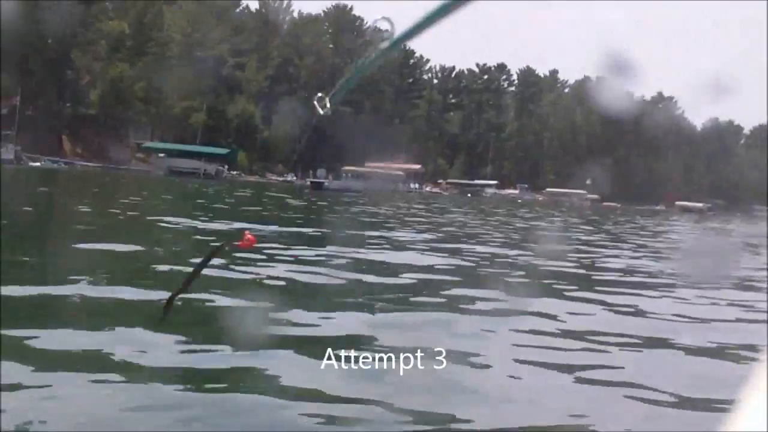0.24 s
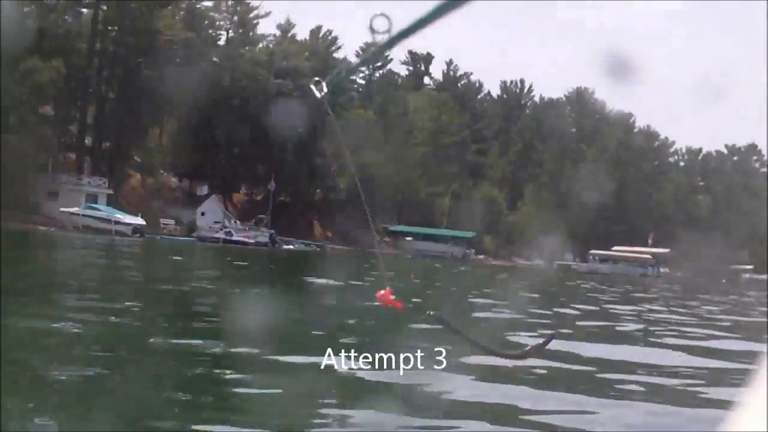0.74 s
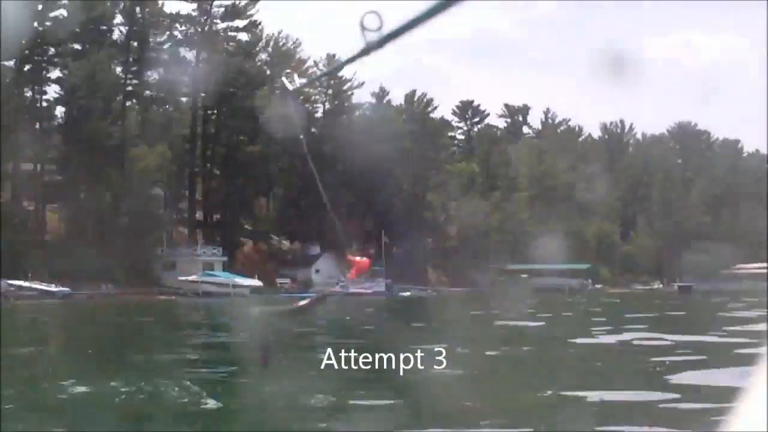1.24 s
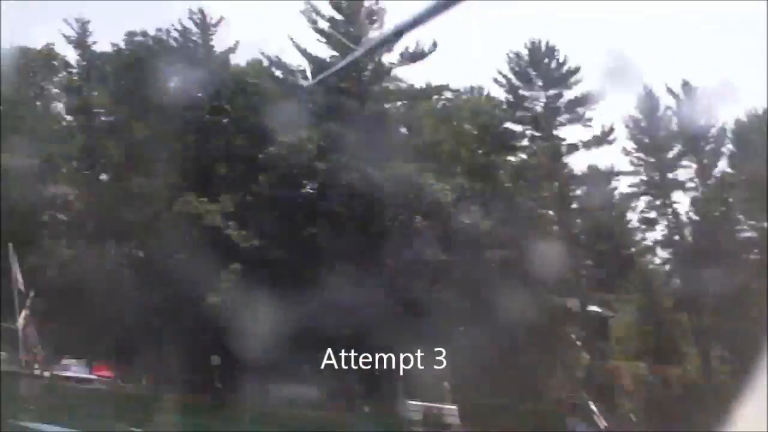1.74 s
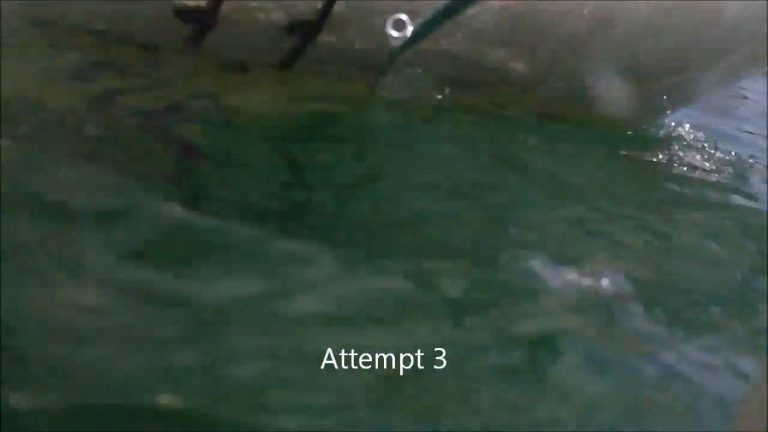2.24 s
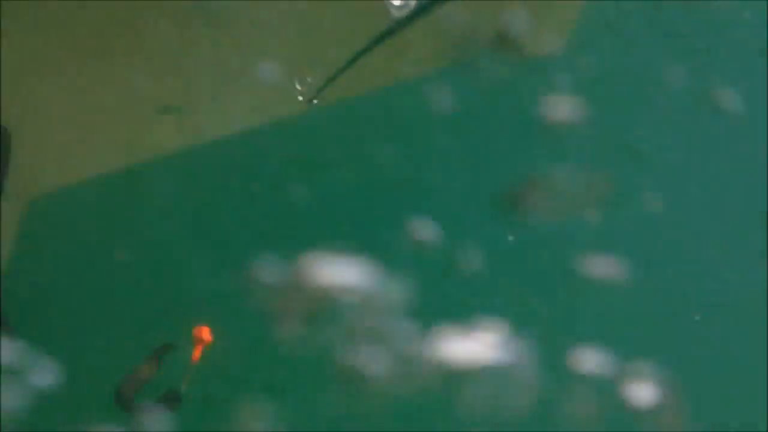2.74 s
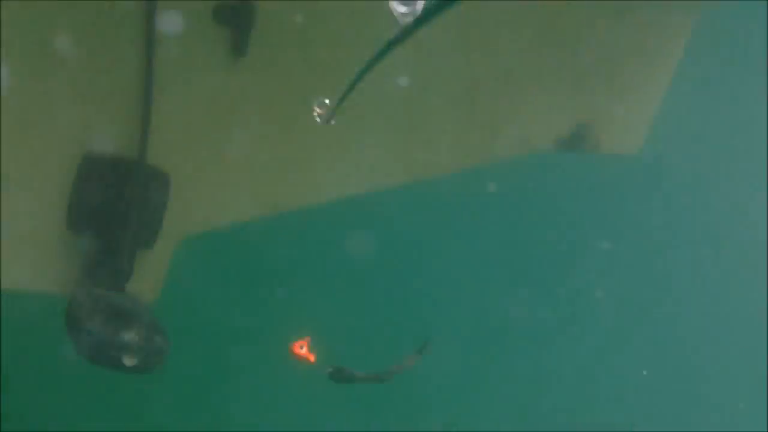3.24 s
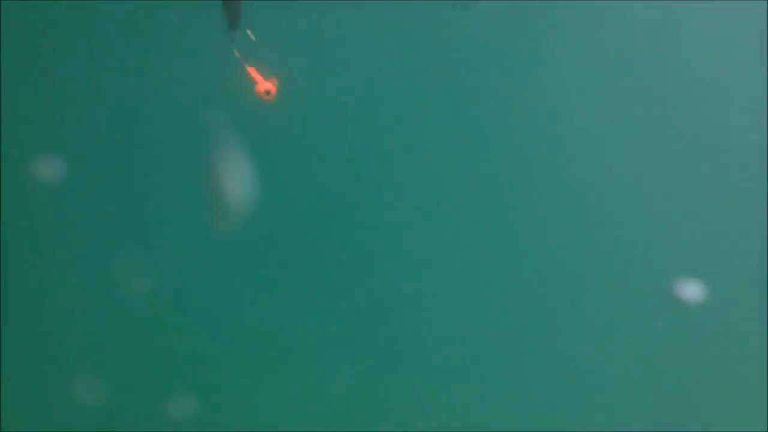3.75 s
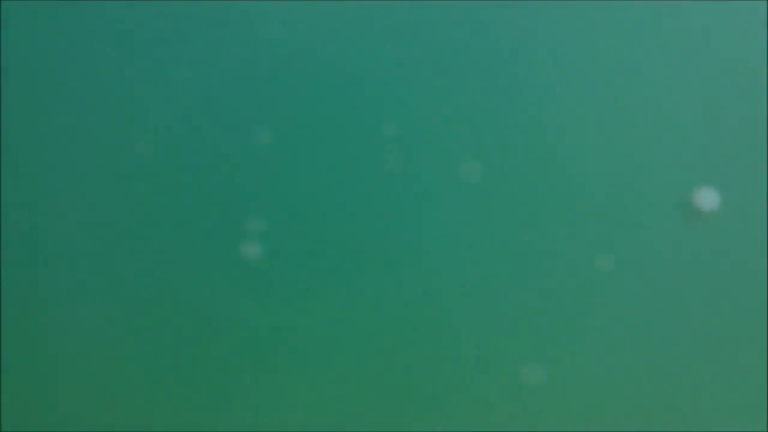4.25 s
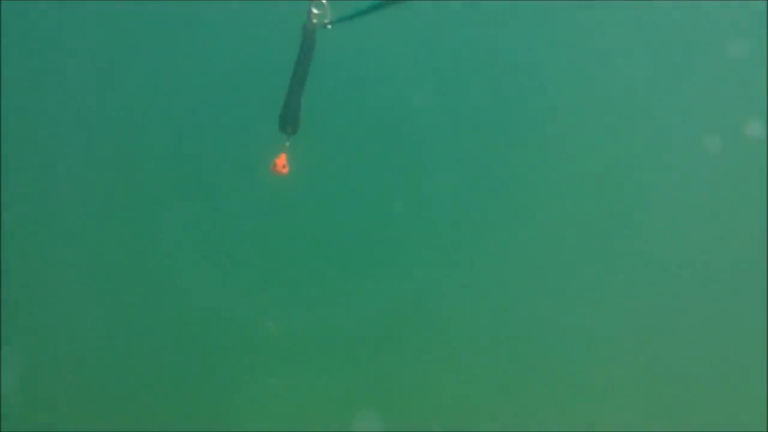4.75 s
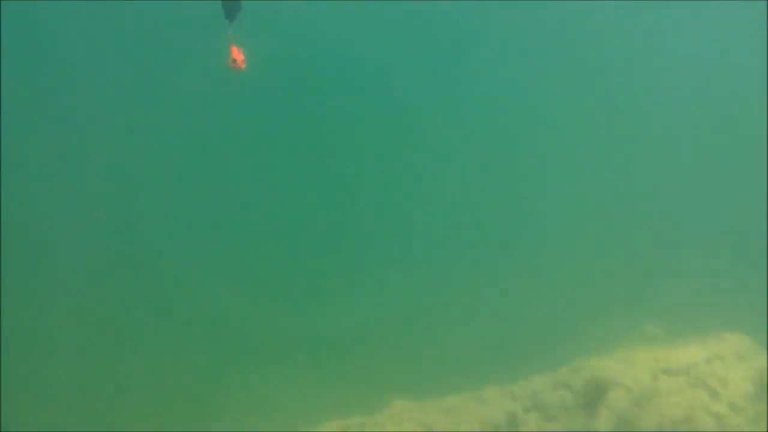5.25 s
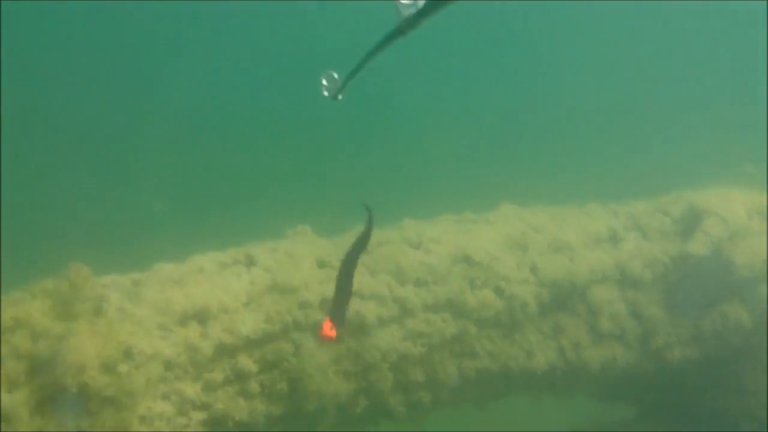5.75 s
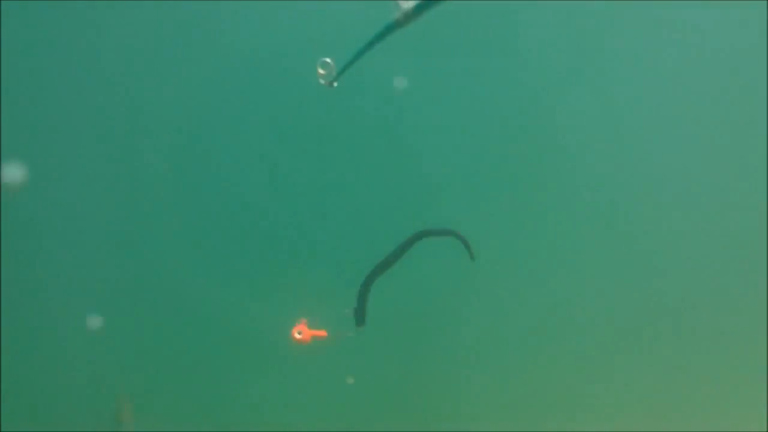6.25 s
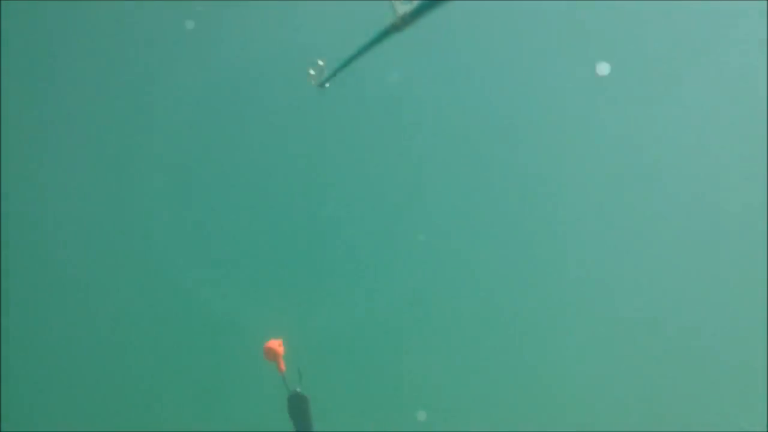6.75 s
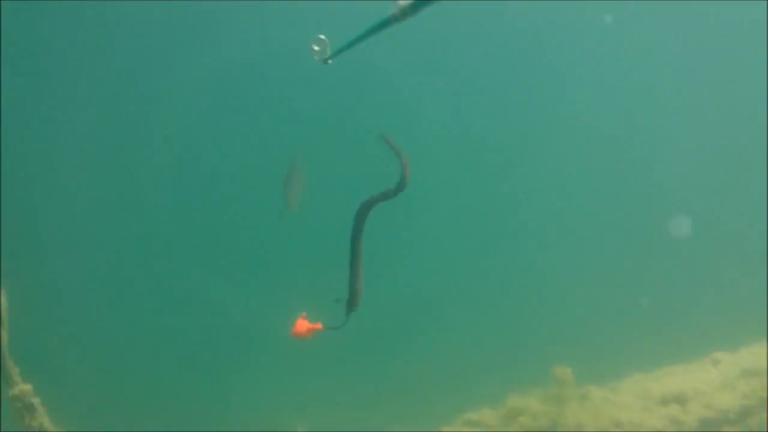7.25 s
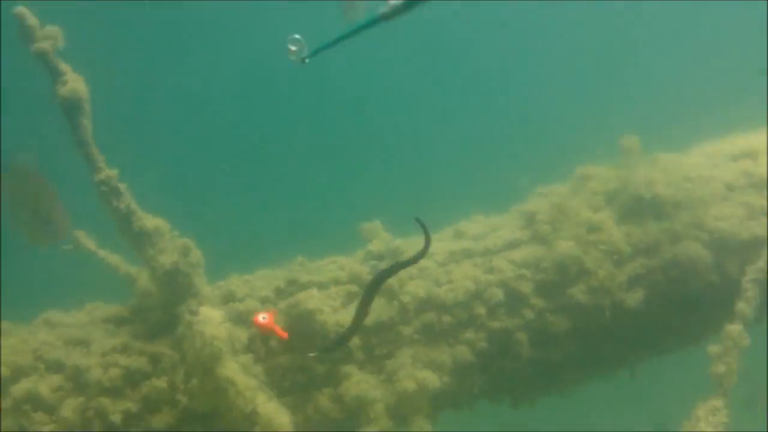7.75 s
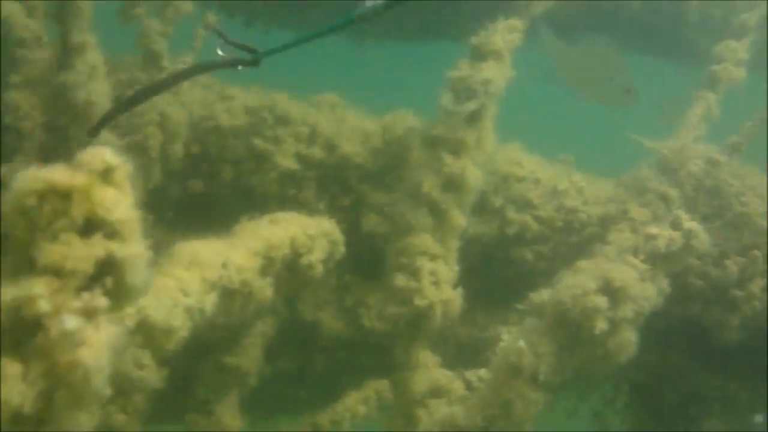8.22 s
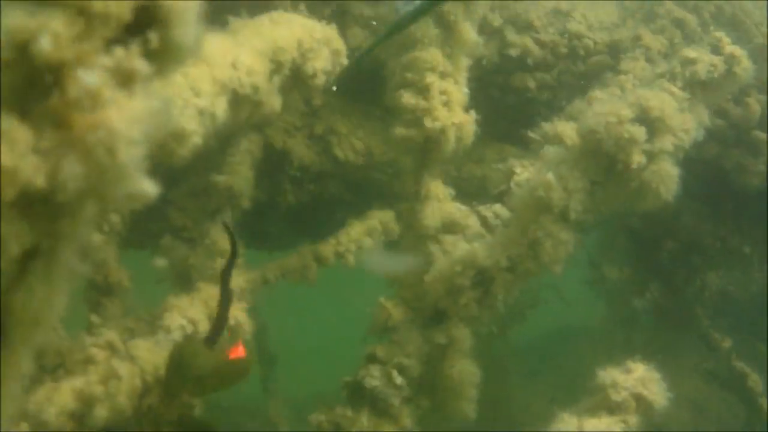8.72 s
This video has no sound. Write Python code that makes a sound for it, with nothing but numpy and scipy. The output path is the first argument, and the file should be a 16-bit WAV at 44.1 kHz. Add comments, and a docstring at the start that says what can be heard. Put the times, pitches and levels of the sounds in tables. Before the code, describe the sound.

A microphone sealed in a plastic housing picks up everything close, boxy and band-limited. From 0 to 1 s hands rub a pole that wobbles with low rumble, under soft hiss, ticking drops and light slaps. At about 1.05-1.4 s hollow air gulps crowd together with hard, overloading plastic snaps and a short falling groan of trapped air. A quieter gap holds a knock at 1.6 s. From 1.8 to 2.6 s drops, bright slaps, gulps and fine bubbles splash around the shell, with a sharp crack near 2.5. It calms, then knocks at 3.4-3.6 s. Between 3.8 and 5.1 s come dull heavy drags, clunks, snaps and low stuttering creaks. A hollow, hissing wash swells from about 4.5 to 6.6 s, then thins, with faint scuffs. Around 7.7-8.3 s bumps, scrapes and a quick rising creak finish.

```python
"""A small camera in a plastic housing is swung on a pole over a lake, dunked and lowered to a sunken tree.
At first hands rub the pole, which wobbles, amid hiss and faint wash; drops tick, air gulps, water slaps.
Then the plastic snaps and trapped air rings in glides; later the wash, noise combed by its echo, swells
and the pole creaks by stick-slip. Noise and blows excite resonant modes of the housing; air pockets are
gliding sines. The microphone is narrow and overloads on the hardest blows."""
import sys
import numpy as np
from scipy import signal
from scipy.fft import rfft, irfft
from scipy.io import wavfile
from scipy.ndimage import uniform_filter1d, map_coordinates

SR = 44100
rng = np.random.default_rng(int(sys.argv[2]) if len(sys.argv) > 2 else 0)


def to_wav(sig):
    """Store sig (one row per channel, or 1-D mono) as 16-bit WAV at the path in sys.argv[1].

    Samples outside -1..1 are clipped; the rate is SR.
    """
    pcm = np.clip(np.atleast_2d(sig), -1, 1) * 32767
    pcm = np.round(pcm).astype(np.int16)
    wavfile.write(sys.argv[1], SR, pcm.T)  # frames by channels


N = 396018
T = np.arange(N) / SR  # time [s]

# Levels in the tables are relative within each source.
# resonant modes of the housing: (frequency [Hz], width [Hz], level [dB])
HOUSING_MODES = [(300.3, 123, -2.5), (556.4, 117, 6), (869, 122, 2.5), (1029, 123, -0.5), (1324, 320, 0.5),
                 (1782, 207, -6), (2180, 790, -10), (3580, 1200, -14.5), (4870, 1100, -17),
                 (6330, 1300, -21)]
# hands and water dragging on pole and housing: (time [s], level [dB])
RUB_LEVELS = [(0, -35.5), (.35, -45.5), (.85, -37.5), (1.08, -28.5), (1.23, -54), (1.27, -46.5),
              (1.47, -58), (1.78, -49), (2.0, -36.5), (2.62, -29.5), (2.8, -50.5), (3.33, -48.5),
              (3.45, -29), (3.9, -23.5), (3.97, -40.5), (4.2, -17), (4.38, -35), (4.72, -21.5),
              (4.93, -34.5), (5.25, -38), (5.9, -46), (6.75, -54.5), (7.65, -51.5), (7.75, -33),
              (8.1, -41.5), (8.25, -49)]
# hiss around the microphone: (time [s], level [dB])
HISS_LEVELS = [(0, -45), (1.21, -52), (1.27, -89), (1.9, -54), (2.8, -55), (3.4, -49), (4, -60.5),
               (5.2, -45), (7.6, -55), (8, -41.5), (8.3, -55)]
# spectrum of the hiss: (frequency [Hz], level per Hz [dB])
HISS_SPECTRUM = [(35, -59.5), (60, -30), (185, -25), (295, -17.5), (313, -11.5), (1700, -4), (2300, -12),
                 (4040, -7), (7400, -12)]
# spells in which the pole wobbles at its lowest bending: (start [s], length [s], level [dB])
WOBBLE_SPELLS = [(0, 1.23, -52), (1.75, 0.89, -60.5), (3.6, 0.3, -49.5), (4.13, 0.081, -46.5),
                 (4.5, 0.34, -54), (4.85, 0.05, -46), (5.17, 0.031, -45.5), (7.43, 0.031, -52),
                 (7.74, 0.078, -48), (7.92, 0.22, -53.5)]
# wash of moving water, ringing in a thin gap: (time [s], level [dB], comb spacing [Hz])
WASH_COURSE = [(2.5, -58.5, 2960), (3.2, -51, 3145), (4.3, -53, 3030), (4.6, -42.5, 2960), (5.2, -44, 2960),
               (5.8, -44, 2903), (6.1, -40, 3006), (6.55, -42.5, 3173), (6.8, -58, 3240)]
# drops and small bubbles: (time [s], level [dB], starting pitch [Hz])
DROP_EVENTS = [(0.0879, -25.5, 4500), (0.101, -25, 4000), (0.449, -26, 4480), (0.503, -23.5, 4120),
               (0.536, -23, 4150), (0.549, -22.5, 4500), (0.5884, -27.5, 4020), (0.651, -21.5, 4300),
               (0.671, -26, 4220), (0.733, -32, 2970), (0.776, -30, 4360), (1.207, -45, 3500),
               (1.216, -42, 4000), (1.305, -43.5, 4300), (1.324, -39, 4070), (1.59, -36, 4350),
               (1.674, -37, 4500), (1.7962, -18.5, 4860), (1.808, -18.5, 6950), (1.837, -13, 6350),
               (1.879, -36, 4700), (1.906, -33, 1760), (1.9968, -16, 2290), (2.025, -27, 2040),
               (2.039, -14, 3750), (2.0728, -19.5, 2940), (2.103, -19.5, 1930), (2.114, -18, 3260),
               (2.165, -26, 6330), (2.402, -24.5, 4640), (2.505, -22, 3640), (3.167, -37, 2490),
               (3.215, -31.5, 1520), (3.241, -35.5, 1300), (3.3843, -24.5, 3370), (3.402, -14, 3220),
               (3.589, -18, 2340), (3.751, -37, 2180), (6.727, -31.5, 4020), (7.1625, -22, 2850),
               (7.4949, -37, 4150), (7.785, -16, 1450), (8.347, -30.5, 2720)]
# showers of fine spray and small bubbles: (start [s], length [s], level [dB])
SPRAY_SPELLS = [(1.88, 0.68, -36), (3.38, 0.24, -44)]
# air pockets ringing at the housing: (time [s], level [dB], starting pitch [Hz], 60 dB decay time [s])
GULP_EVENTS = [(0.18, -24.5, 1084, 0.037), (0.631, -14, 570, 0.014), (0.929, -27.5, 530, 0.14),
               (0.988, -19, 544, 0.12), (1.056, -15, 406, 0.075), (1.074, -6, 536, 0.17),
               (1.104, -6, 470, 0.18), (1.129, -6.5, 522, 0.11), (1.225, -4, 558, 0.044),
               (1.34, -17.5, 352, 0.14), (1.363, -8, 316.6, 0.066), (1.624, -7.5, 509, 0.041),
               (1.836, -14, 487.4, 0.16), (1.899, -24, 1070, 0.15), (1.989, -13.5, 596, 0.072),
               (2.039, -20, 957, 0.1), (2.073, -20.5, 1097, 0.13), (2.195, -16, 551, 0.28),
               (2.328, -7, 975, 0.048), (2.422, -22.5, 630, 0.078), (2.496, 0, 1195, 0.024),
               (2.566, -6.5, 536, 0.036), (2.655, -8.5, 383, 0.12), (2.895, -23.5, 291, 0.16),
               (2.939, -20, 320, 0.093), (3.055, -21, 661, 0.088), (3.056, -25, 343, 0.092),
               (3.363, -18.5, 810, 0.042), (3.431, -2.5, 593, 0.06), (3.508, -11, 578, 0.054),
               (3.604, -13, 569, 0.082), (3.89, -14, 260.7, 0.11), (4.179, -13, 561, 0.11),
               (4.46, -13.5, 522, 0.13), (4.675, -12, 580, 0.076), (4.759, -4, 326, 0.099),
               (5.045, -12, 515, 0.09), (5.078, -8, 885, 0.062), (7.781, -3.5, 696, 0.025),
               (8.057, -19.5, 1200, 0.029)]
# water slaps and scuffs: (time [s], level [dB], length [s], brightness [dB])
SLAP_EVENTS = [(0.396, -14, 0.031, 23), (0.494, -24, 0.029, 4), (0.524, -35, 0.064, 31.5),
               (0.784, -24, 0.013, 20), (0.882, -16, 0.081, -7), (1.354, -3.5, 0.0062, 20.5),
               (1.368, -3.5, 0.014, 2), (1.615, -26, 0.015, 19), (1.837, -7.5, 0.016, 3),
               (1.899, -26.5, 0.027, 33.5), (2.197, -2.5, 0.011, 24), (2.2414, -1.5, 0.0092, 27),
               (2.258, -8, 0.0066, 31.5), (2.267, -9.5, 0.017, 18), (2.319, -14, 0.023, 24),
               (2.372, -14, 0.0058, 24.5), (2.456, -2.5, 0.0084, 13.5), (2.47, -17, 0.017, 23),
               (2.525, -27, 0.087, 24), (3.491, -6.5, 0.0083, 3), (3.58, -13, 0.015, 10),
               (4.119, -13.5, 0.065, 1), (4.173, -20, 0.071, -26), (4.46, -3.5, 0.035, -24),
               (4.747, -2, 0.023, 6), (4.977, -13.5, 0.2, -11), (6.046, -30, 0.037, 13.5),
               (6.856, -31, 0.13, 0.5), (7.151, -35.5, 0.094, 10.5), (7.413, -28.5, 0.089, 0),
               (7.685, -15.5, 0.047, -11), (7.75, -13, 0.018, 22), (7.77, -19.5, 0.025, 24),
               (7.793, -19, 0.028, 16.5), (7.873, -30, 0.091, 21), (7.922, -6, 0.019, 21),
               (7.964, -27, 0.022, 16.5), (8.015, -12, 0.029, -8), (8.07, -21, 0.023, 6.5),
               (8.166, -19, 0.046, 16.5), (8.343, -29.5, 0.18, -10)]
# hard snaps of the plastic: (time [s], level [dB])
SNAP_EVENTS = [(1.0958, 5), (1.162, 7), (1.1734, -7.5), (1.2323, 5.5), (1.3569, 4.5), (1.3598, 5),
               (1.3765, 2.5), (2.2604, -2), (2.4628, 8), (3.8147, 5.5), (4.1699, 5.5), (4.7563, 2.5),
               (4.7601, 7)]
# glides of squeezed trapped air, one list each: (time [s], mean pitch [Hz], level [dB])
TRAPPED_GLIDES = [
    [(1.157, 353.9, -14), (1.19, 367.3, -18), (1.215, 316, -12), (1.24, 284, -19)],
    [(2.56, 188, -33.5), (2.64, 257, -39)],
    [(2.69, 425, -35), (2.725, 602, -39), (2.745, 1200, -42)],
    [(1.99, 377, -30.5), (2.1, 412, -39.5), (2.2, 464, -42)],
]
# stick-slip of the pole, one list per creak: (time [s], mean slip rate [Hz], level [dB])
CREAK_GLIDES = [
    [(3.815, 158, -13.5), (3.87, 186, -16.5), (3.93, 202, -47)],
    [(4.17, 137, -13), (4.25, 135, -31), (4.29, 146.8, -21), (4.38, 137, -24), (4.46, 137, -27.5)],
    [(4.53, 151, -26), (4.6, 147.6, -20.5), (4.66, 138, -44)],
    [(7.924, 340, -13.5), (7.95, 434, -16.5)],
]

SHALLOW_BRIGHT_DB = 4  # brightness of the drag near the surface
DEEP_FROM_S, DULLING_DB_PER_DB = 3.68, 0.42  # from here on, harder drags turn duller
WOBBLE_HZ, WOBBLE_WIDTH_HZ = 75, 32
WOBBLE_REST_DB, WOBBLE_SWELL_DB_PER_S, WOBBLE_FADE_DB_PER_S = -75.5, 146.5, 82.5
SPRAY_REST_DB, SPRAY_SWELL_DB_PER_S, SPRAY_FADE_DB_PER_S = -68, 105, 111
TRAPPED_THIRD_DB = 31.5  # offset of the third partial, which grows faster than the level
MIC_TOP_HZ, TOP_HZ = 7050, 16000


def undb(db):
    """Amplitude is the exponential of level in decibels."""
    return np.exp(np.asarray(db) * (np.log(10) / 20))


def unit(x):
    """Normalization to a root mean square of 1."""
    return x / np.sqrt(np.mean(x ** 2))


def curves(table):
    """Linear interpolation of each table column in time."""
    s, *columns = np.transpose(table)
    return [np.interp(T, s, column) for column in columns]


def band(x, hz, width_hz):
    """Two-pole resonance with gain 1 at its centre."""
    return signal.lfilter(*signal.iirpeak(hz, hz / width_hz, fs=SR), x)


def walk(rate):
    """Slow random modulation: levels held 1 / rate s, smoothed twice, spread 1."""
    hold = int(SR / rate / 16)  # computed on every 16th sample
    steps = np.repeat(rng.standard_normal(N // 16 // hold + 2), hold)
    smooth = uniform_filter1d(uniform_filter1d(steps, hold), hold)
    return np.repeat(unit(smooth), 16)[:N]


def add(out, s, sound):
    """Superposition of a sound starting at time s."""
    i = int(s * SR)
    out[i:i + len(sound)] += sound[:N - i]


def spells(table, rest_db, swell_db_per_s, fade_db_per_s):
    """Exponential growth and decay: each spell swells from rest, holds for its length and fades (in dB)."""
    levels = []
    for s, length, level in table:
        before, after = np.maximum(s - T, 0), np.maximum(T - s - length, 0)
        levels.append(level - swell_db_per_s * before - fade_db_per_s * after)
    return np.maximum(np.max(levels, axis=0), rest_db)


def grit(scatter_db):
    """Granular noise: dense grains of uneven, bounded size, rms 1."""
    size_db = scatter_db * np.minimum(rng.exponential(size=N), 4)
    return unit(rng.standard_normal(N) * undb(size_db))


def housing(push, bright, flicker_db=None, rate=22):
    """Modal superposition: a bright push favours modes above 600 Hz; each mode may flicker alone."""
    out = 0
    for k, (hz, width_hz, db) in enumerate(HOUSING_MODES):
        tilt = np.clip(np.log2(hz / 600) / 2.86, 0, 1) ** 0.91
        drive = push * bright ** tilt
        if flicker_db is not None:
            drive = drive * undb(flicker_db * walk(rate))
        mode = band(band(drive, hz, width_hz), hz, 3 * width_hz)
        out = out + (-1) ** k * undb(db) * np.sqrt(SR / width_hz) / 10 * mode
    return out


def rub():
    """Sliding friction: dragging comes in jerks, the more uneven the harder it drags."""
    db = curves(RUB_LEVELS)[0]
    bright_db = SHALLOW_BRIGHT_DB - (T > DEEP_FROM_S) * DULLING_DB_PER_DB * (db + 55)
    uneven = np.clip((db + 40.5) / 14, 0, 1)
    jerks = undb(2.2 * uneven * walk(60))
    return housing(grit(scatter_db=1.0) * undb(db) * jerks, undb(bright_db), 3.1 * uneven)


def hiss():
    """Spectral shaping: white noise weighted to a smooth colour."""
    hz, colour_db = np.transpose(HISS_SPECTRUM)
    f = np.maximum(np.fft.rfftfreq(N, 1 / SR), 1)
    weight = undb(np.interp(np.log(f), np.log(hz), colour_db))
    noise = irfft(rfft(rng.standard_normal(N)) * weight, N)
    return undb(curves(HISS_LEVELS)[0] + 1.7 * walk(8.5)) * unit(noise)


def wobble():
    """Random excitation of damped bending: uneven pushes on low modes over a little broader rumble."""
    push = rng.standard_normal(N) * undb(5.6 * walk(22))
    bending = band(band(push, WOBBLE_HZ, WOBBLE_WIDTH_HZ), WOBBLE_HZ, 2 * WOBBLE_WIDTH_HZ)
    second = band(band(push, 148, 25), 110, 50)
    rumble = band(push, 80, 100)
    db = spells(WOBBLE_SPELLS, WOBBLE_REST_DB, WOBBLE_SWELL_DB_PER_S, WOBBLE_FADE_DB_PER_S)
    return undb(db) * (unit(bending) + 0.42 * unit(second) + 0.52 * unit(rumble))


def wash():
    """Comb interference: noise plus two rounds of its echo across a gap, over a steady hollow band."""
    db, spacing_hz = curves(WASH_COURSE)
    combed = direct = band(rng.standard_normal(N), 6100, 8900)
    for k in (1, 2):
        delayed = np.arange(N) - k * SR / spacing_hz
        combed = combed + 1.5 ** k * map_coordinates(direct, [delayed], order=1)
    hollow = band(band(rng.standard_normal(N), 800, 160), 920, 600)
    return undb(db + walk(20) + 1.1 * walk(4)) * (unit(combed) + 0.5 * unit(hollow))


def drops():
    """Bubble resonance: drops crackle around a brief rising ring, beside a random swarm of small bubbles."""
    out, t = np.zeros(N), T[:360]
    for s, db, hz in DROP_EVENTS:
        ring = np.sin(2 * np.pi * hz * t * (1 + 4 * t)) * np.exp(-t * hz / 7.4)
        burst = rng.standard_normal(len(t)) * np.exp(-t / 0.0019)
        crackle = band(burst, hz, min(0.81 * hz, 6000))
        add(out, s, undb(db) * (ring + 1.5 * crackle))
    swarm_db = spells(SPRAY_SPELLS, SPRAY_REST_DB, SPRAY_SWELL_DB_PER_S, SPRAY_FADE_DB_PER_S)
    swarm_db = swarm_db + 5.2 * walk(40)  # clusters
    for place, size, pitch, glide, cycles in rng.random((5000, 5)):
        s, hz = place * T[-1], 700 * 7.5 ** pitch ** 1.2
        age = t * hz / (2 + 8 * cycles)
        swell = age * np.exp(1 - age) ** 2
        ring = np.sin(2 * np.pi * hz * t * (1 + 16 * (glide - .4) * t)) * swell
        bubble_db = swarm_db[int(s * SR)] - 10.5 - 5.1 * np.log(size + .03)
        add(out, s, undb(bubble_db) * ring)
    return out


def gulps():
    """Cavity resonance: a pocket swells and rings at a wavering pitch; its onset also knocks the housing."""
    out, knock, t = np.zeros(N), np.zeros(N), T[:SR // 4]
    drift = np.cumsum(0.026 * walk(90)) / SR
    for s, db, hz, t60 in GULP_EVENTS:
        swell = 1 - np.exp(-(t / (0.023 * t60)) ** 2)
        shape = swell * 1000 ** (-t / max(t60, .01))
        i = int(s * SR)
        wander = drift[i:][:len(t)] - drift[i]
        phase = 2 * np.pi * hz * (t * (1 + 0.28 * t) + wander)
        bent = 0.32 * (300 / hz) ** 2  # big, low pockets ring with stronger overtones
        ring = np.sin(phase) + bent * np.sin(2 * phase) + .5 * bent * np.sin(3 * phase)
        add(out, s, undb(db - 3.5) * shape / shape.max() * ring)
        add(knock, s, undb(db) * np.exp(-t / .005))
    throb = undb(3 * walk(120))
    return out * throb + housing(knock * grit(scatter_db=2.5) * undb(-4.0), undb(-2.0))


def slaps():
    """Impact excitation: grit rises fast, holds through the contact and falls off at its end."""
    force, bright, t = np.zeros(N), np.zeros(N), T[:SR // 4]
    for s, db, length, bright_db in SLAP_EVENTS:
        rise = np.minimum(t / (0.027 * length + 1.5 * length ** 2), 1)  # long scuffs set in softly
        shape = undb(db - 8) * rise * np.exp(-(t / max(length, .003)) ** 2.34)
        add(force, s, shape)
        add(bright, s, shape * undb(bright_db))
    push = grit(scatter_db=2.5) * undb(2.2 * walk(300))
    # spray lands unevenly, so each mode is fed in quick patches
    spray = housing(push * force, bright / (force + 1e-9), 4.5, rate=170)
    shove = band(band(force, 76, 65), 76, 120)  # each blow also shoves the whole housing
    return spray + undb(-11.5) * shove


def snaps():
    """Impulse response: a crack of about one cycle, and the blow it gives the housing."""
    out, t = np.zeros(N), T[:120]
    for s, db in SNAP_EVENTS:
        add(out, s, undb(db) * np.sin(2 * np.pi * 2600 * t) * np.exp(-t / 0.00011))
    return 1.335 * out + 1.12 * housing(out, 3.0)


def trapped():
    """Squeezed-cavity resonance: a wavering, gliding tone sheds grit once a cycle into the housing."""
    out, shed = np.zeros(N), np.zeros(N)
    throb_db, waver = 3 * walk(90), 1 + .035 * walk(70)
    for table in TRAPPED_GLIDES:
        hz, db = curves(table)
        on = uniform_filter1d(1. * ((T > table[0][0]) & (T < table[-1][0])), size=300)
        level = on * undb(db + throb_db)
        phase = 2 * np.pi * np.cumsum(hz * waver) / SR
        third = undb(2.53 * db + TRAPPED_THIRD_DB) * np.sin(3 * phase)
        out += level * (np.sin(phase) + third)
        shed += level * (1 + np.cos(phase)) ** 2
    return out + housing(shed * grit(scatter_db=3.5) * undb(-12.5), undb(-1.0))


def creaks():
    """Stick-slip friction: one push per slip, each of its own size; the slip rate itself hums faintly."""
    push, hum, bright = np.zeros(N), np.zeros(N), np.ones(N)
    sizes, waver = undb(2.5 * walk(150)), 1 + .018 * walk(60)
    for table in CREAK_GLIDES:
        hz, db = curves(table)
        on = (T > table[0][0]) & (T < table[-1][0])
        turns = np.cumsum(hz * waver) / SR
        slips = np.diff(np.floor(turns), prepend=0)
        push += on * undb(db) * sizes * slips * np.sqrt(SR / hz)
        bright[on] = undb(np.minimum(10.0 * (db[on] + 13), 6))  # gentle slips are soft and dull
        hum += uniform_filter1d(1. * on, size=400) * undb(db - 19.5) * np.sin(2 * np.pi * turns)
    push = push + 2.18 * band(push, 1410, 1100)  # the grip's own ring
    return undb(-0.5) * housing(push, bright) + hum


def scene():
    """Superposition at one microphone in the housing; blows on the stiff shell carry little deep bass."""
    high_pass = signal.butter(1, 200, "high", fs=SR, output="sos")
    blows = signal.sosfilt(high_pass, drops() + gulps() + slaps() + snaps())
    return (rub() + hiss() + wobble() + wash() + blows + trapped() + creaks())[None]


def record(dry):
    """Band limiting and saturation: narrow microphone path, hard overload after it, then the top cut."""
    mic_path = signal.ellip(10, .3, 85, MIC_TOP_HZ, fs=SR, output="sos")
    top_cut = signal.ellip(8, .2, 60, TOP_HZ, fs=SR, output="sos")
    overloaded = np.clip(signal.sosfilt(mic_path, dry), -.97, .97)
    return signal.sosfilt(top_cut, overloaded)


dry = scene()
out = record(dry)
to_wav(out)
```